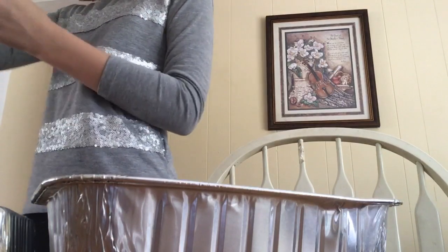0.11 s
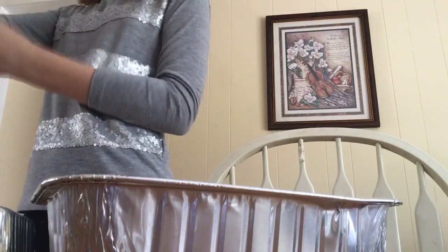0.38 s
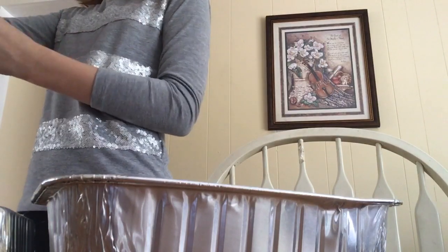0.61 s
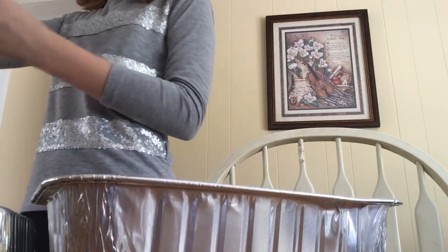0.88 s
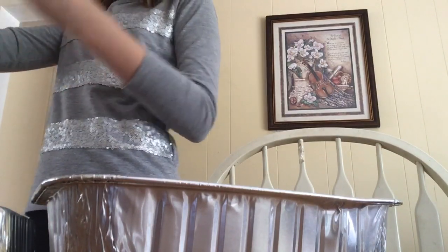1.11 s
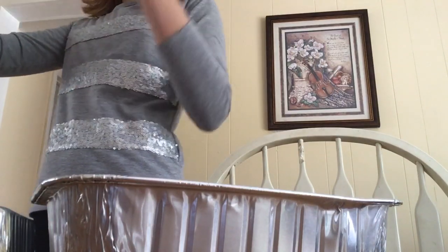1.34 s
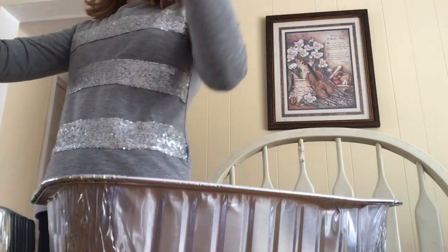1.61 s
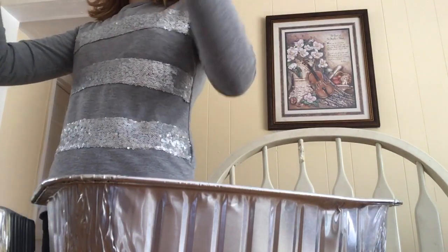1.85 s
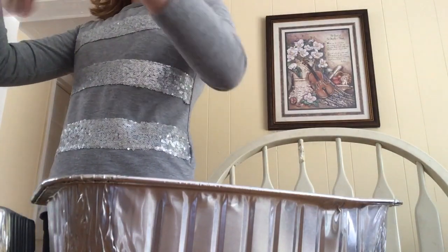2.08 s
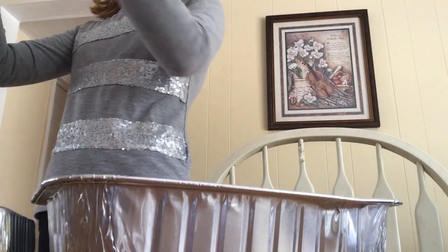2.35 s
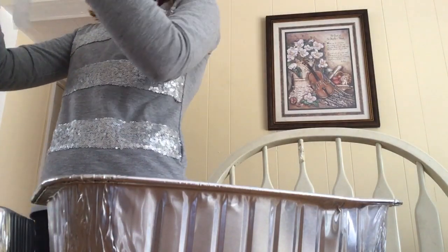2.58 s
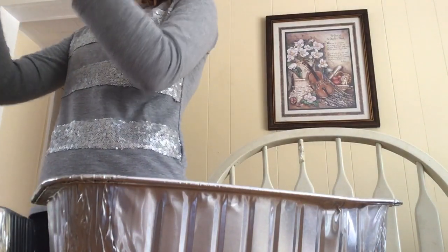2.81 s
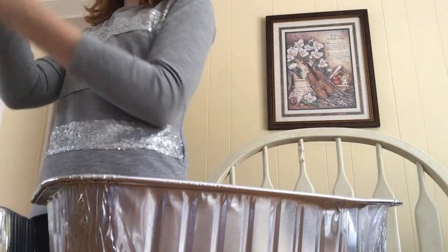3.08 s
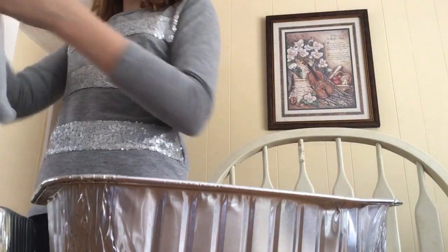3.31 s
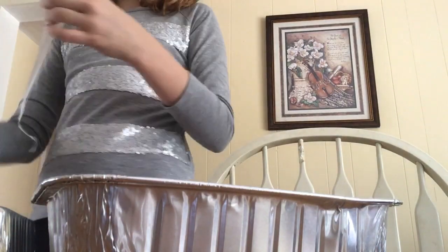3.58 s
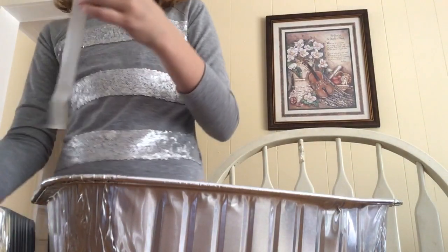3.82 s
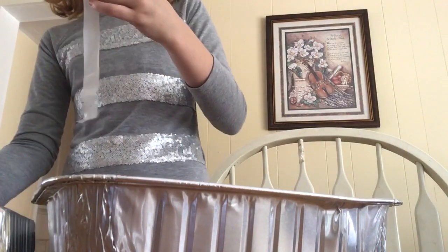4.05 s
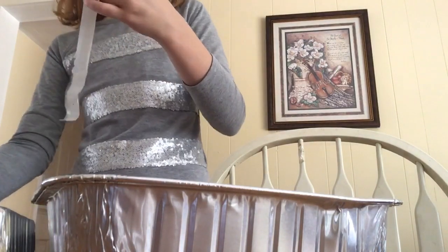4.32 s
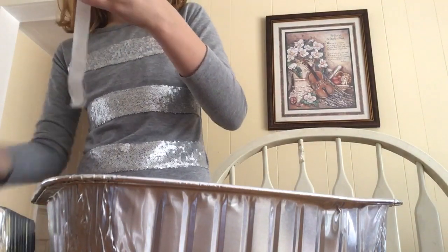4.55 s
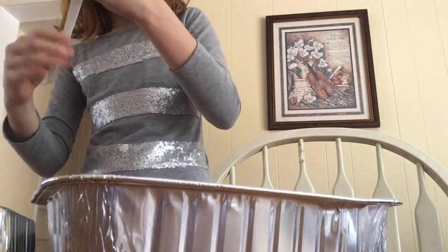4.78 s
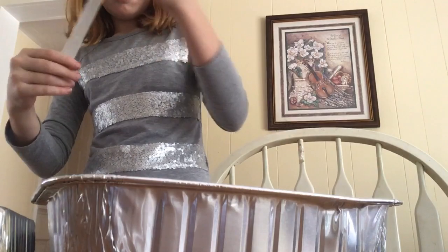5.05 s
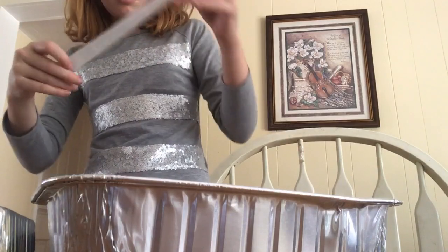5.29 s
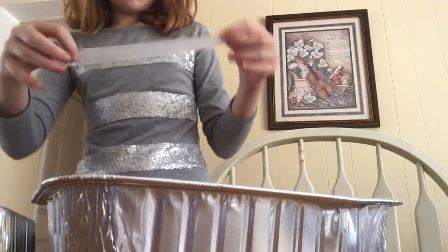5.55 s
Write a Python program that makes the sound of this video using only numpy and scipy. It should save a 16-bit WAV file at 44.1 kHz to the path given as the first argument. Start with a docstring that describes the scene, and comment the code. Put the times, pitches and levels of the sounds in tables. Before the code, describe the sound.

A small indoor room, with the microphone very near the tape. A ventilation fan runs steadily: low mains-like hum, several drifting tones up to about 1 kHz and soft, dull rushing air. At 0.1 s a loud, dry snap of adhesive cracks out, another at 0.28 s, then from 0.34 to 0.40 s a dense burst of tearing crackle with the roll knocking on desk and hollow core. Short bright echoes follow. Tiny ticks come near 1.2, 1.5, 1.9-2.0 and 2.5-2.7 s. At about 2.9 s a small crisp click cluster coincides with switching the fan off; its tones die in under half a second, and a low whirr slides downward, shuddering, as the air fades. At 3.78 s the cardboard core gives a hollow tap with a snap, at 4.25 s a sharp thin snap, and from 5.1 to 5.6 s light crackles in near quiet with faint hiss and low hum.

```python
"""Sticky tape crackles close to the microphone in a small room: picked at, torn off its roll and handled,
each release of glue a jerk that rings the film; now and then the roll is knocked and its core and the desk ring.
Behind it a ventilation fan hums and blows: drifting tones and coloured noise. Switched off, its tones die
and the rotor whirrs down, shuddering, to about half speed; the air sinks towards the quiet of the house.
Echoes of tape and roll die away at a different rate in each part of the spectrum."""
import sys
import numpy as np
from scipy import signal
from scipy.fft import rfft, irfft, next_fast_len
from scipy.io import wavfile
from scipy.ndimage import uniform_filter1d, map_coordinates

SR = 44100
rng = np.random.default_rng(int(sys.argv[2]) if len(sys.argv) > 2 else 0)


def volts_from_db(level):
    """Convert decibel levels to linear amplitude ratios."""
    exponent = np.asarray(level, float) / 20
    return 10 ** exponent


def put_to_file(sound):
    """Save the sound as 16-bit audio at rate SR, in the file named by the first command-line argument."""
    columns = np.atleast_2d(sound).T  # one column per channel
    safe = np.clip(columns, -1, 1)
    whole_steps = np.round(safe * 32767)
    wavfile.write(sys.argv[1], SR, whole_steps.astype(np.int16))


N = 249606  # length [samples]
LEAD = SR // 4  # time ahead of the start whose echoes are still heard [samples]

# steady floor of the house, scaled as a whole to QUIET_DB: (frequency [Hz], relative level per Hz [dB])
QUIET_SPECTRUM = [(12, -45.5), (20, -16.5), (135, -9), (273, -14), (465, -18), (900, -21), (1500, -31.5),
                  (2200, -34.5), (4000, -39), (5500, -41.5), (9000, -38), (14000, -44), (15600, -50.5),
                  (16300, -63)]
QUIET_DB = -60  # rms
# distant appliances: (frequency [Hz], rms level [dB], unsteadiness [dB])
APPLIANCES = [(58.2, -72, 3), (122.7, -64.5, 2)]
# a faint thin tone: (from [s], to [s], frequency [Hz], rms level [dB], unsteadiness [dB])
THIN_TONE = (3.2, 3.8, 2430, -81, 3)

# air rush of the fan: (frequency [Hz], relative level per Hz [dB])
AIR_SPECTRUM = [(24, -39), (45, -14.5), (104, -4), (241, -2.5), (480, -5.5), (780, -11), (1060, -12.5),
                (1300, -17.5), (1730, -23.5), (2100, -28.5), (3500, -33.5), (5000, -39), (9000, -40.5),
                (15000, -53), (16500, -72.5)]
# resonances of the duct: (frequency [Hz], width [Hz], lift [dB])
DUCT_RESONANCES = [(172.4, 15.7, 9), (271.5, 30, 6), (651, 180, 7.5), (4150, 73, 7.5)]
FAN_DB, AIR_DB_PER_DECADE = -41.5, 58.5  # air rush at full speed, and its change per decade of rotor speed
AIR_WAVERS_DB = 0.8
# mains buzz and shaft orders: (frequency [Hz])
MOTOR_HZ = [58.2, 100.7, 119.5, 220.7, 240, 259.5, 448, 581.5, 959.3, 1004.7, 1060.4, 1079.4, 1198.3, 1577,
            1680, 1782, 1820]
# level of each of those tones: (rms level [dB], unsteadiness [dB])
MOTOR_LEVELS = [(-55, 0.9), (-51.5, 0.5), (-52.5, 1.5), (-65.5, -6.5), (-47, 1.1), (-56, 3), (-56, -3.4),
                (-59, 0.5), (-59.5, 0.5), (-65, 4), (-65.5, 1), (-61, 3), (-74, 3), (-79.5, -9),
                (-74.5, -3.5), (-70.5, -2), (-80, -5)]
# power cut: (time [s], time for the tones to fall 60 dB [s])
SWITCH_OFF = (2.907, 0.42)
SLOW_SPEED, RUN_DOWN_S = 0.47, 0.73  # share of full speed the rotor sinks towards; time constant
WHIRR_HZ, WHIRR_RISE_S = 188.2, 0.038  # whirr at full speed; time constant of its rise after the power cut
# resonance of the housing that the whirr passes: (frequency [Hz], half width [Hz], gain at the centre [dB])
HOUSING = (171.5, 23, -49)
# rotor speeds at which the housing shudders: (whirr frequency [Hz], half width [Hz], rms level [dB])
SHAKES = [(174, 11, -53), (125, 13, -58)]
# sound of that shudder: (frequency [Hz], relative level per Hz [dB])
SHUDDER_SPECTRUM = [(15, -23), (26, 3), (40, -18), (60, -4), (90, -11), (150, -45.5)]
# rumble of the coasting rotor: (frequency [Hz], relative level per Hz [dB])
RUMBLE_SPECTRUM = [(30, -36), (55, 10), (90, -0.5), (180, -17), (260, -21), (400, 4.5), (800, -74)]

# decay of the small room: (frequency [Hz], time to fall 60 dB [s])
ROOM_DECAY = [(300, 0.053), (2500, 0.47), (8000, 0.42), (15000, 0.26)]
# room against direct sound, changing as the tape moves about: (time [s], level [dB])
ECHO_LEVEL = [(0, -7), (2.9, -3.5), (3.8, -9), (4.25, -11.5), (5.66, -7)]

# knocks of the roll: (time [s], three times the rms of the first 20 ms [dB],
# time scale of the contact [s], share on the hollow core, the rest on the desk [0-1])
KNOCKS = [(0.3499, -24, 0.000074, 0.6), (0.351, -17.5, 0.0008, 0), (.3605, -24, 0.0008, 0.3),
          (.3640, -25, 0.0004, 0.46), (.3690, -26, 0.0002, 0.6), (0.378, -33.5, 0.014, 0.6),
          (3.7830, -33.5, 0.000054, 1), (3.7845, -28.5, 0.0002, 1), (3.7878, -20, 0.00018, 1),
          (3.7918, -37, 0.00016, 1), (3.7948, -27, 0.00012, 0.8), (3.7972, -29, 0.00012, 1),
          (4.064, -47, 0.00071, 1)]
# modes of the hollow core: (frequency [Hz], level [dB], time to fall 60 dB [s])
CORE_MODES = [(555, -2, 0.05), (612, 7, 0.06), (693, 3, .04), (725, 3, 0.04), (815, 5, 0.02),
              (920, 7, 0.04), (1036, 9, 0.055), (1150, -4, .02), (1300, -5, 0.025), (1454, 2, .06),
              (1690, -6, 0.04), (2330, -7, 0.04), (2465, -7, 0.06)]
# modes of the desk: (frequency [Hz], level [dB], time to fall 60 dB [s])
DESK_MODES = [(305, -1, 0.05), (398, 7, 0.094), (465, 7, 0.033), (506, 6, 0.032)]
ROUGH_CONTACT = 0.3  # chatter of a knock against its smooth push

# stretches of dense crackle, peeling or rubbing; the band is applied twice:
# (start [s], length [s], rms level before the stroke's swell [dB], centre [Hz], width of one pass [Hz])
RUSTLES = [(-.12, 0.096, -35, 7500, 12000), (0.347, 0.068, -29.5, 7000, 18100),
           (0.349, 0.065, -32, 695, 1560), (1.394, 0.022, -63, 8000, 6000), (1.93, 0.034, -63, 10500, 7000),
           (2.565, 0.038, -61, 7100, 4500), (2.655, 0.03, -64, 8000, 9000), (2.831, 0.19, -68, 11000, 7000),
           (2.9188, 0.034, -48.5, 10500, 8000), (2.919, 0.034, -55, 2900, 3000),
           (3.28, 0.12, -68.5, 8700, 6090), (3.782, 0.0045, -36.5, 5040, 4500),
           (3.783, 0.025, -42, 2000, 2970), (3.789, 0.0097, -46, 3570, 3000),
           (4.057, 0.01, -55.5, 9000, 8000), (4.256, 0.028, -57, 6300, 2510),
           (4.425, 0.081, -69.5, 3000, 6030), (4.68, 0.22, -76.5, 6400, 3920),
           (4.881, 0.1, -70, 13500, 7050), (5.092, 0.085, -71, 9050, 7000), (5.22, 0.025, -59, 9450, 4980),
           (5.373, .07, -71, 9900, 9100), (5.449, 0.21, -72, 7100, 6000)]
# unevenness of the releases by level of the rustle: (level [dB], unevenness [dB])
UNEVENNESS = [(-75, 4), (-56, 5), (-26.5, 4)]
STRAY_DB, STRAY_SCATTER_DB = 1, -5  # chance snaps inside each rustle: peak over its level, and scatter

# snaps of glue letting go, and two early echoes (4.2646 and 4.2693 s) of the one at 4.255 s:
# (time [s], direct peak [dB], body, middle and top against the main part [dB] x 3,
# slackness, which widens the resonances [1 = as tabled])
SNAPS = [(0.1184, -6.5, 6, 0.5, 2.5, 1.17), (0.281, -10.5, -3, 11, -6, 1.7), (0.2815, -5, 1, -11, -4, 1.35),
         (0.3377, -5.5, 3.5, 4, -3, 1.6), (0.3382, -8.5, 8, 3, -7, 1.9), (0.3468, -26, -8, -2, 0, 2.6),
         (0.351, -18, 3, 2, -6, 2.6), (0.3516, -8.5, 4, -4, 8, 4), (0.3513, -7, -3, -1, -3, 2.2),
         (0.3545, -16, 2, 0, 2, 2.2), (0.3593, -22, 2, -3, -7, 2.3), (0.363, -24, 2, 2, 0, 2),
         (0.3640, -22, 7, 0, 6, 2.2), (0.3689, -8.5, 9, 4, -4, 2), (0.3707, -18, 7.5, 0.5, -4.5, 2),
         (0.3728, -19.5, -5.5, 3, -2, 2.86), (0.3778, -18, -0.5, 3.5, -4, 2.3),
         (0.3790, -21, -8.5, 0, -2.5, 3), (0.383, -20, -5, -1, -1, 2.4), (0.3873, -20, -6, -2.5, 0, 2.4),
         (0.3911, -14.5, 6.5, -1, -0.5, 2.7), (0.391, -14, 6, 3.5, 0.5, 2.5),
         (0.3985, -23, -4, 0.5, 0, 2.4), (1.1755, -44, -6, -2, 3, 2), (1.1766, -36, -5, 2.5, -1, 1.7),
         (1.1948, -35, -18, -8, 1, 3.2), (1.452, -43, -8, -6, 0, 2.6), (1.794, -47, -1, 0, -1, 2.3),
         (1.8905, -42, -6, -2, -2, 3.1), (1.9400, -41, -10, -2, -2, 2), (1.9413, -32.5, -14, -10, -4, 2.2),
         (1.9468, -47, -12, -10, 6, 3), (1.9550, -48, -12, -2, -2, 2.8), (1.9617, -45, -12, -8, -2, 3),
         (1.9760, -50, -10, -4, 2, 3), (1.9955, -32.5, -8, -10, -5, 2.2), (2.0105, -49, -8, -8, 5, 3),
         (2.5086, -45, -8, 2, 2, 2.6), (2.5758, -42, -8, 12, 8, 2), (2.5853, -47, -10, 9, -3, 2.7),
         (2.5920, -50, -6, 5, 6, 2.6), (2.6277, -47, -8, 5, -6, 3), (2.6572, -41, -8, 10, -12, 3.2),
         (2.6655, -35.5, 16, 3, -2, 2.9), (2.6735, -50, -4, 2, 2, 2.6), (2.8951, -44, -13, -3, -12, 2.2),
         (2.9030, -46, -15, -8, 2, 2), (2.9122, -39, -18, -2, -12, 2), (2.9188, -31, -18, -2, -10, 1.6),
         (2.9229, -31, -9, -13, -10, 2), (2.9246, -29, -13, -10, -13, 1.6), (2.93, -30, -8, -10, -11, 2),
         (2.9325, -31, -18, -10, -1, 2.7), (2.9455, -38, -14, -8, 0, 2.8), (3.3258, -45, -15, -7, -12, 2.2),
         (3.3507, -39, -7, -1, -4, 3.4), (3.783, -21, 13, 4, -6, 2.6), (3.7906, -43, 16, 0, -8, 2.9),
         (3.834, -33, -6.5, -1, 3, 2.3), (4.0170, -50, -13, 0, -3, 2.4), (4.0576, -52, -6, -10, 1, 2.6),
         (4.0593, -40, -5, -2, -4, 3.6), (4.2200, -63, -11, -3, -6, 2.6), (4.251, -43, -11, -0.5, -2, 2.6),
         (4.2551, -23.5, -15, -3.5, -11, 2.6), (4.2646, -37, -19.5, 4, -1, 3.2),
         (4.2693, -46, -15, 0.5, 2, 3), (5.0891, -36.5, -16, -12, -10, 3.1), (5.1085, -45, -11, -9, 0, 3),
         (5.1171, -36, -4, -13, 4, 3.3), (5.1290, -53, -9, -6, 2, 3), (5.161, -41.5, 6, -14, 0, 3.3),
         (5.1644, -37.5, 4, -8, -8, 3.2), (5.2208, -40, 6, -4, -12, 2.8), (5.294, -52, -6, -3, 12, 2.7),
         (5.3932, -45, -17, -11, 5, 2.9), (5.3975, -33, -1, -12, 9, 3.5), (5.4130, -30.5, -1, -10, -2.5, 4),
         (5.4145, -37, -2, -7, -3, 2.5), (5.4222, -47, -8, -5, -5, 3.6), (5.5599, -33, -3, -9.5, 3.5, 3.4),
         (5.5690, -52, -10, -4, 5, 3), (5.5706, -45, -11.5, -7, 5, 2.6)]
# resonances of the taut film, in body, lower middle, upper middle, main and top parts:
# (frequency [Hz], width before widening [Hz], level, to be divided by the slackness [dB])
FILM_PARTS = [
    [(814, 550, -8.5), (1290, 99, 4), (1880, 260, -0.5), (2120, 110, 1), (3307, 150, 4.5)],
    [(4620, 150, 0.5), (5180, 380, -2.5), (6040, 470, 0)],
    [(6550, 400, -1), (7050, 940, 6)],
    [(8000, 410, 0), (8980, 560, 11), (9360, 540, 3), (10090, 400, 5.5), (11000, 270, -1)],
    [(11400, 480, 3), (12600, 500, -0.5), (13500, 900, -6), (15200, 1400, -10)],
]
# the jerk itself, heard unrung under the resonances: (frequency [Hz], width [Hz], level against the body [dB])
CRACK = (2700, 7800, -15)
# narrow rings that taut tape sends into the room: (frequency [Hz], width [Hz], level [dB])
LASTING_RINGS = [(1285, 60, -9), (2100, 50, -7.5), (3360, 55, -2), (8700, 250, 10)]
LASTING_LOSS_DB = 12  # per unit of slackness above 1
BLUR = 2.1  # widening of the resonances over all directions
# colour of the sound sent into the room, lows and extreme top strong, 6-9 kHz weaker:
# (frequency [Hz], level [dB])
SPREAD = [(1000, 3.5), (3500, 2.5), (6000, -2.5), (9000, -1.5), (15000, 4)]
MIDDLE_DB = -1.5  # lower middle part against the mean of body and upper middle
COLOUR_SCATTER_DB, SHIFT = 1.5, 0.006  # chance colour of each part; chance shift of each resonance [share]
FOLLOWERS, LIMP = 0.2, 3.66  # weaker jerks per unit of tautness; slackness at which tautness is zero

# dips of the microphone port: (frequency [Hz], width [Hz], level [dB])
PORT_DIPS = [(4910, 440, -1.5), (10500, 570, -3)]
TOP_HZ, STEEP = 15850, 90  # sharp upper limit of all that is heard; sharpness of that cut


def unit(x):
    """Scaled to rms 1."""
    return x / np.sqrt(np.mean(x ** 2) + 1e-20)


def along(points, hz):
    """Reads (Hz, value) points along a log axis."""
    f, v = np.transpose(points)
    return np.interp(np.log(hz + 1), np.log(f + 1), v)


def curves(rows):
    """One value per sample for each column after the time."""
    s, *cols = np.transpose(rows)
    return [np.interp(np.arange(N) / SR, s, c) for c in cols]


def wobble(rate):
    """A smooth random curve, rate knots a second (40 at most)."""
    knots = rng.standard_normal(int(N / SR * 40) + 4)
    return map_coordinates(knots, [np.arange(N) * min(rate, 40) / SR])


def filtered(x, response):
    """x times a complex response of frequency."""
    m = next_fast_len(len(x) + 4096)
    return irfft(rfft(x, m) * response(np.fft.rfftfreq(m, 1 / SR)), m)[:len(x)]


def lifted(f, lifts):
    """dB added around (Hz, width, dB) centres."""
    return sum(db / (1 + (2 * (f - c) / w) ** 2) for c, w, db in lifts)


def resonances(modes):
    """Causal response of (Hz, width, dB) resonances, added with alternating sign."""
    def response(f):
        return sum((-1) ** k * volts_from_db(db) * 1j * f * w / (c * c - f * f + 1j * f * w)
                   for k, (c, w, db) in enumerate(modes))
    return response


def causal(gain):
    """The response of this gain that starts only with the blow (minimum phase)."""
    c = irfft(np.log(gain + 1e-6))
    half = len(c) // 2
    return np.exp(rfft(np.r_[c[0], 2 * c[1:half], c[half], np.zeros(half - 1)]))


def noise(spectrum, lifts=()):
    """Coloured noise of rms 1."""
    hiss = rng.standard_normal(N)
    return unit(filtered(hiss, lambda f: volts_from_db(along(spectrum, f) + lifted(f, lifts))))


def tones(rows):
    """Sum of (Hz, rms dB, unsteadiness dB) sines whose level and phase drift a little."""
    t = np.arange(N) / SR
    total = np.zeros(N)
    for hz, db, drift_db in rows:
        level = np.sqrt(2) * volts_from_db(db + drift_db * wobble(6.1))
        phase = 0.18 * drift_db * wobble(5.07) + rng.uniform(0, 2 * np.pi)
        total += level * np.sin(2 * np.pi * hz * t + phase)
    return total


def add(track, s, x):
    """Mixes x into a track that begins LEAD samples early."""
    part = track[LEAD + round(s * SR):][:len(x)]
    part += x[:len(part)]


def house():
    """The steady floor: coloured noise with microphone hiss, distant appliances and a passing thin tone."""
    start, end, *tone = THIN_TONE
    on, = curves([(start - .1, 0), (start, 1), (end, 1), (end + .1, 0)])
    return volts_from_db(QUIET_DB) * noise(QUIET_SPECTRUM) + tones(APPLIANCES) + on * tones([tone])


def fan():
    """Air rushes through the duct; tones stop with the power, then the rotor whirrs down and shakes its housing."""
    off, t60 = SWITCH_OFF
    since = np.clip(np.arange(N) / SR - off, 0, None)
    speed = SLOW_SPEED + (1 - SLOW_SPEED) * np.exp(-since / RUN_DOWN_S)
    air_db = FAN_DB + AIR_DB_PER_DECADE * np.log10(speed) + AIR_WAVERS_DB * wobble(2.6)
    air = volts_from_db(air_db) * noise(AIR_SPECTRUM, DUCT_RESONANCES)
    motor = volts_from_db(-60 * since / t60) * tones([(hz, *row) for hz, row in zip(MOTOR_HZ, MOTOR_LEVELS)])

    whirr_hz = WHIRR_HZ * speed
    loose = 1 - np.exp(-since / WHIRR_RISE_S)

    def passing(hz, half_hz, db):  # swells as the whirr sweeps through hz; 4.5 dB down at the half width
        return loose * volts_from_db(db - 4.5 * ((whirr_hz - hz) / half_hz) ** 2)

    turning = np.sin(2 * np.pi * np.cumsum(whirr_hz) / SR)
    whirr = np.sqrt(2) * volts_from_db(1.4 * wobble(14)) * turning + volts_from_db(-0.5) * noise(RUMBLE_SPECTRUM)
    shudder = sum(passing(*row) for row in SHAKES) * noise(SHUDDER_SPECTRUM)
    return air + motor + passing(*HOUSING) * whirr + shudder


def room(x):
    """Echoes dying by frequency; hands and tape move, so the echo pattern is new every quarter second."""
    out = np.zeros(len(x) + 2 * SR)
    for start in range(0, len(x), LEAD):
        hz, t, z = signal.stft(rng.standard_normal(SR * 3 // 4), SR, nperseg=256)
        decay = volts_from_db(-60 * t / along(ROOM_DECAY, hz)[:, None])
        tail = signal.istft(z * decay, SR, nperseg=256)[1]
        tail *= 1 - np.exp(-np.arange(len(tail)) / SR / 0.0025)  # echoes build up over a few ms
        wet = signal.fftconvolve(x[start:start + LEAD], tail / np.linalg.norm(tail))
        out[start:start + len(wet)] += wet
    return out[:len(x)]


def knocks():
    """A rough contact that swells and dies away shakes the decaying modes of the core and the desk."""
    out, t = np.zeros(N + LEAD), np.arange(SR // 4) / SR

    def ringing(modes):
        return sum(volts_from_db(db - 60 * t / t60) * np.sin(2 * np.pi * hz * t) for hz, db, t60 in modes)

    def above(x, hz):  # no bass under the lowest mode
        return filtered(x, lambda f: ((1j * f) ** 2 / (hz * hz - f * f + 1j * f * hz)) ** 3)

    core, desk = above(ringing(CORE_MODES), hz=560), above(ringing(DESK_MODES), hz=250)
    for s, db, contact, share in KNOCKS:
        share = np.clip(share, 0, 1)
        chatter = 1 + ROUGH_CONTACT * rng.standard_normal(len(t))
        push = chatter * (t / contact) * np.exp(-(t / contact) ** 2)
        ring = signal.fftconvolve(push, share * core + (1 - share) * desk)[:len(t)]
        add(out, s, volts_from_db(db) * ring / (3 * np.std(ring[:SR // 50])))
    return out


def rustles():
    """Dense tiny releases of uneven size, swelling fast and thinning out."""
    out = np.zeros(N + LEAD)
    for s, length, db, hz, width_hz in RUSTLES:
        uneven_db = np.interp(db, *np.transpose(UNEVENNESS))
        u = np.linspace(0, 1, max(round(length * SR), 64))
        # the size of the grains varies over about a millisecond
        clumps = uniform_filter1d(rng.standard_normal(SR // 2), size=40)[:len(u)] * np.sqrt(40)
        grains = rng.standard_normal(SR // 2)[:len(u)] * volts_from_db(uneven_db * np.clip(clumps, -3, 2))
        stroke = np.abs(np.sin(np.pi * u ** 0.61)) ** 0.32
        band = resonances([(hz, width_hz, 0)])
        add(out, s, volts_from_db(db) * stroke * unit(filtered(grains, lambda f: band(f) ** 2)))
    return out


def strays():
    """Two chance snaps inside every rustle, as rows like those of SNAPS."""
    luck = rng.standard_normal((len(RUSTLES), 2, 4))
    rows = []
    for (s, length, db, *_), pair in zip(RUSTLES, luck):
        for a, b, c, d in pair:
            time = s + length * (.5 + np.tanh(a) / 2)
            peak_db = db + STRAY_DB + STRAY_SCATTER_DB * b
            rows.append((time, peak_db, -8 + 4 * c, -4 + 2 * c, -3 + 4 * d, 2.6))
    return rows


def snaps():
    """Each release is one sharp jerk and a few weaker ones that ring the film; two early echoes are made alike.
    Returns the sound towards the microphone and, with resonances blurred over all directions, into the room."""
    near, around = np.zeros(N + LEAD), np.zeros(N + LEAD)
    t = np.arange(1024) / SR
    jerk = 1. * (np.arange(len(t)) == 16)

    def thin(f):  # bass falls away below 450 Hz
        return 1j * f / (450 + 1j * f)

    for s, db, body_db, middle_db, top_db, slack in SNAPS + strays():
        tautness = np.clip(LIMP - slack, .1, 1.2)
        swell_and_fade = (1 - np.exp(-t / 0.00071)) * volts_from_db(-60 * t / 0.012)
        burst = FOLLOWERS * tautness * rng.standard_normal(len(t)) * swell_and_fade
        burst[16] = 1  # the sharp jerk
        slack = np.clip(slack, .8, 4)  # slack tape hardly rings

        colour_db = np.array([body_db, (body_db + middle_db) / 2 + MIDDLE_DB, middle_db, 0, top_db])
        colour_db = colour_db + COLOUR_SCATTER_DB * rng.standard_normal(len(FILM_PARTS))
        shift = iter(1 + SHIFT * rng.standard_normal(32))
        # half the dB here, for two passes below: steep flanks beside the strong parts
        modes = [(hz * next(shift), 1.14 * slack * w, (g / slack + part_db) / 2)
                 for part, part_db in zip(FILM_PARTS, colour_db) for hz, w, g in part]

        def power(f, blur):  # the powers of the resonances add up
            return sum(abs(resonances([(hz, blur * w, g)])(f)) ** 4 for hz, w, g in modes)

        def towards_microphone(f):
            crack = abs(volts_from_db(body_db) * resonances([CRACK])(f)) ** 2
            return causal(np.sqrt(power(f, 0.84) + crack)) * thin(f)

        def into_room(f):
            lasting_gain = volts_from_db(body_db - LASTING_LOSS_DB * (slack - 1))
            lasting = abs(lasting_gain * resonances(LASTING_RINGS)(f)) ** 2
            return causal(np.sqrt(power(f, BLUR) + lasting) * volts_from_db(along(SPREAD, f))) * thin(f)

        ring = filtered(burst, towards_microphone)
        blurred = filtered(jerk, into_room)
        gain = volts_from_db(db) / np.abs(ring).max()
        add(near, s, gain * ring)
        # the same energy goes into the room
        add(around, s, gain * blurred * np.linalg.norm(ring) / np.linalg.norm(blurred))
    return near, around


def scene():
    """Tape and knocks close by with their echoes in the room, over fan and house."""
    snap, snap_around = snaps()
    rustle, roll = rustles(), knocks()
    echo = volts_from_db(np.pad(curves(ECHO_LEVEL)[0], (LEAD, 0), "edge"))
    near = snap + rustle + roll + room(echo * (snap_around + rustle + volts_from_db(-1.5) * roll))
    return (near[LEAD:] + fan() + house())[None]


def band_limit(x):
    """A steep low-pass at the top of the band."""
    return signal.sosfilt(signal.butter(12, 17080, fs=SR, output="sos"), x)


def record(dry):
    """Dips of the microphone port, and the sharp upper limit of what is heard."""
    def colour(f):
        upper_limit = 1 / np.sqrt(1 + (f / TOP_HZ) ** STEEP)
        return volts_from_db(lifted(f, PORT_DIPS)) * upper_limit

    heard = filtered(dry[0], colour)
    return band_limit(heard[None])


dry = scene()
out = record(dry)
put_to_file(out)
```